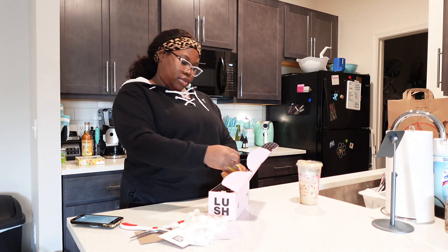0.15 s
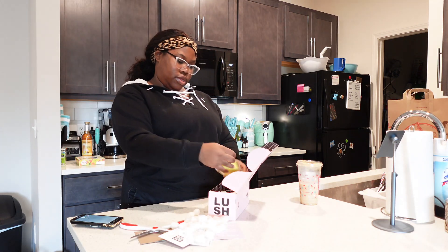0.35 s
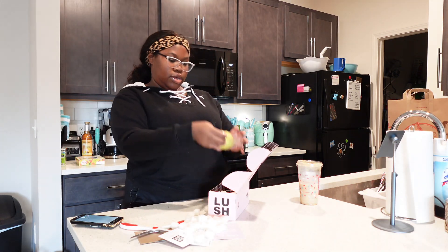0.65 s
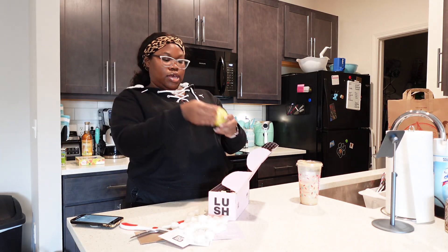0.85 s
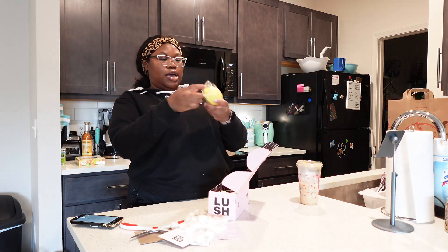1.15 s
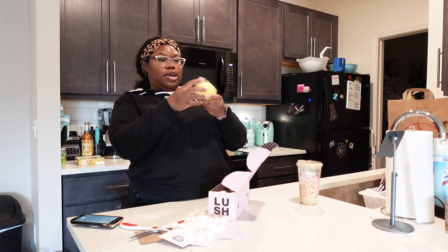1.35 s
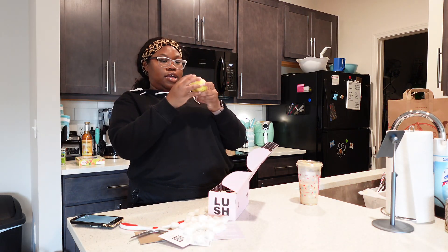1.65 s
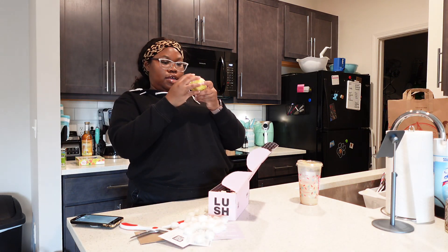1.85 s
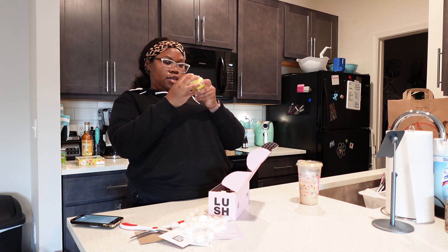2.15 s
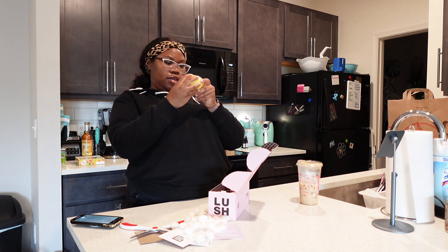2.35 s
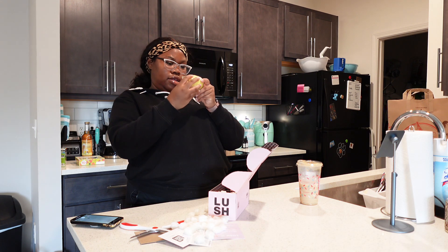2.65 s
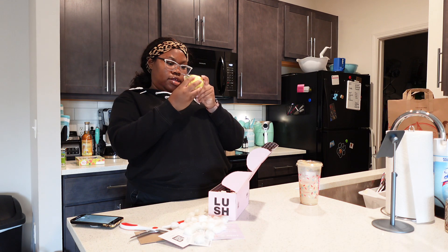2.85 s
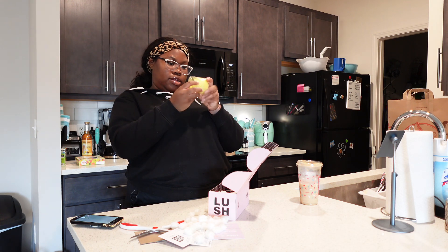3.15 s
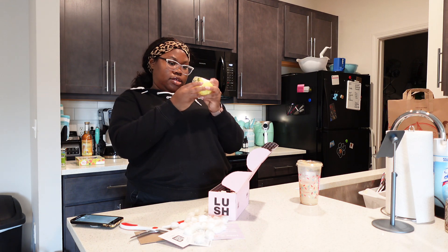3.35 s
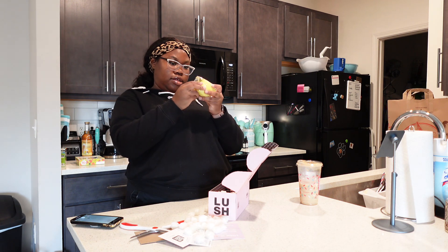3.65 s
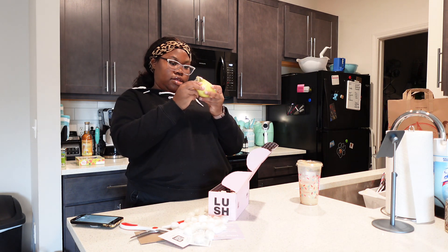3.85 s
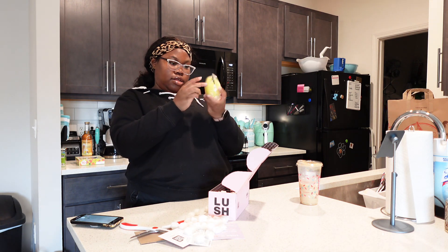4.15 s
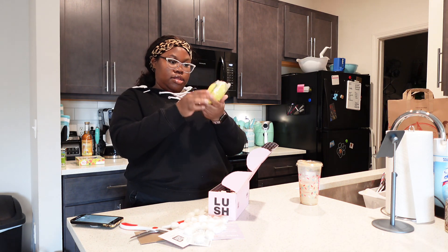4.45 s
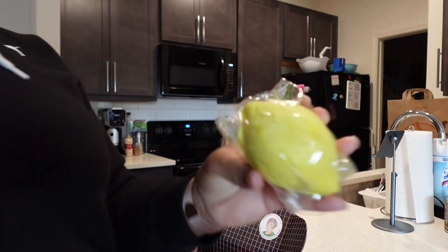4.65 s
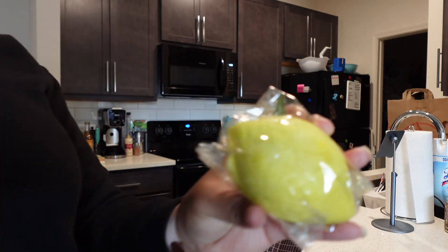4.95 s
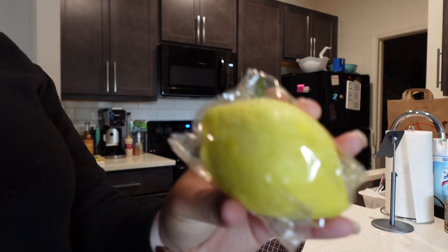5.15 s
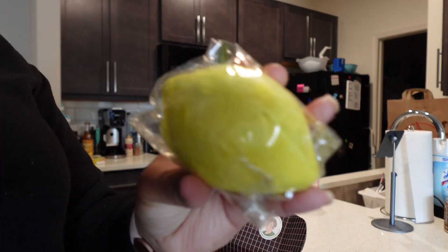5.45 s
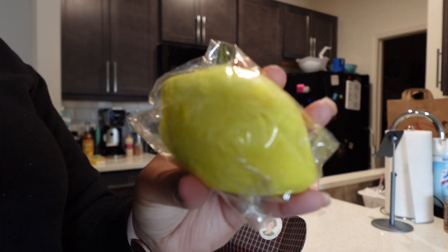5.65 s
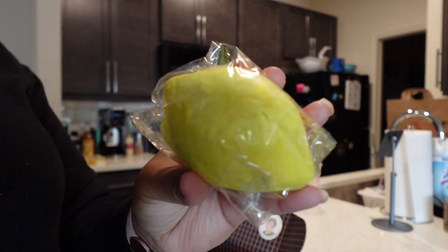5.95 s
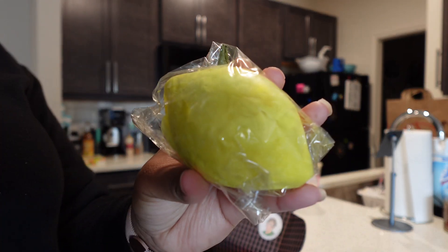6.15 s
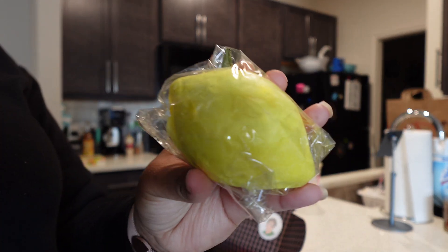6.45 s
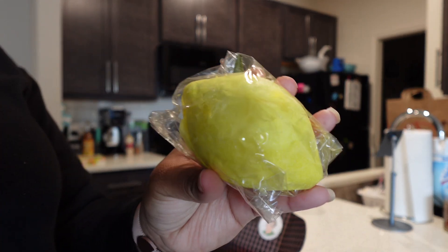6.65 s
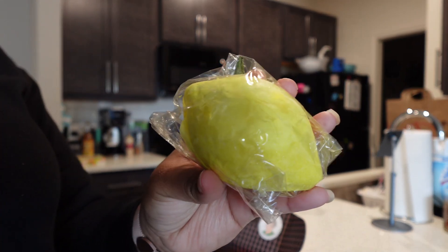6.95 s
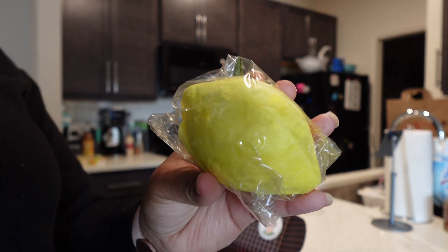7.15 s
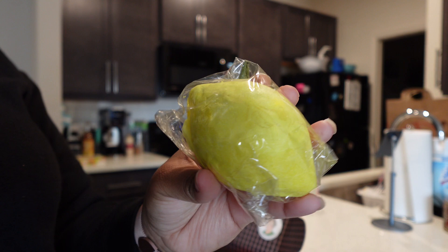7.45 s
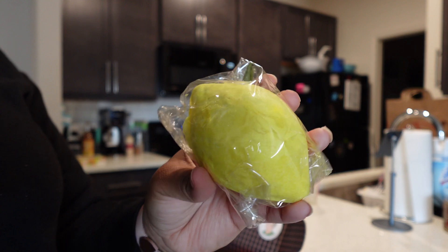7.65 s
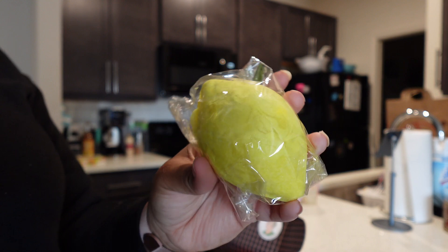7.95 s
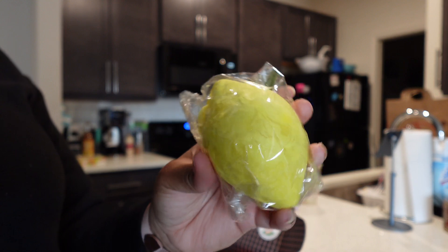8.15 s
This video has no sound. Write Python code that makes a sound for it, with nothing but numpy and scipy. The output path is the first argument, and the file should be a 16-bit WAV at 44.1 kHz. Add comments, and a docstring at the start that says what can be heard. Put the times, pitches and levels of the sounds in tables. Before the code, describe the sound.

Stiff plastic film around a fist-sized bar crackles and snaps in a live kitchen, then close up goes nearly still before fresh loud crinkles.

```python
"""Hands work a bar wrapped in stiff plastic film: panels of film ring briefly as their creases snap.
Many tiny snaps make the crackle, and low noise makes the rub of fingers. Echoes and a fading tail
of sparse taps make the hard kitchen around them; the fading rest of earlier sounds opens the scene.
A refrigerator hums in narrow bands over shaped ventilation noise and hiss.
A cut with a short dip in level joins a distant view to a nearer one with less room sound."""
import sys
import numpy as np
from scipy import signal
from scipy.io import wavfile
from scipy.ndimage import uniform_filter1d

SR = 44100
rng = np.random.default_rng(int(sys.argv[2]) if len(sys.argv) > 2 else 0)


def output_pcm(signal):
    """Save a mono or channel-first signal as 16-bit PCM at the path in sys.argv[1].

    Samples are clipped to [-1, 1] before scaling.
    """
    pcm = np.clip(np.atleast_2d(signal).T, -1, 1) * 32767
    wavfile.write(sys.argv[1], SR, np.round(pcm).astype(np.int16))


def how_loud(loudness_db):
    """Turn decibels into a plain amplitude multiplier (0 dB gives 1, 20 dB gives 10)."""
    steps = np.asarray(loudness_db, float) / 20
    return 10 ** steps


N = 366030  # length [samples]
CUT_S = 4.586  # where the near view takes over from the far one [s]


def evened(x):
    """Scales the whole signal to an rms of 1."""
    return x / np.sqrt(np.mean(x ** 2) + 1e-20)


def unit(x):
    """Scales each row to an energy of 1."""
    return x / np.linalg.norm(x, axis=1, keepdims=True)


def read(points, hz):
    """Reads a curve between its points on a log-frequency axis."""
    f, value = np.transpose(points)
    return np.interp(np.log(hz + 1), np.log(f + 1), value)


def opening_tail(low_db=-54, film_db=-42, t60=0.55):
    """Earlier sounds, a dull one and a crackle, are still dying in the room: fading noise in two bands."""
    noise = rng.standard_normal((2, 2, N))
    low_band = signal.butter(2, [330, 900], "band", fs=SR, output="sos")
    film_band = signal.butter(1, [2000, 8000], "band", fs=SR, output="sos")
    low = signal.sosfilt(low_band, noise[0])
    film = signal.sosfilt(film_band, noise[1])
    both = how_loud(low_db) * evened(low) + how_loud(film_db) * evened(film)
    fading = how_loud(-60 * np.arange(N) / SR / t60)
    return fading * (both + .5 * both[::-1])  # each side also hears half of the other


def hum_and_air(far_db=-1.5):
    """Ventilation noise and microphone hiss from random short-time spectra, and the refrigerator's bands."""
    # colour of the air noise: (frequency [Hz], relative level per Hz [dB])
    air = [(15, -74), (25, -43.5), (70, -26), (184, -6.5), (242, -6), (284, -5.5), (415, -14.5), (772, -16),
           (1070, -20), (1330, -20), (1930, -22.5), (2270, -23), (4720, -27), (13900, -36), (15900, -35)]
    # how alike the air noise is left and right: (frequency [Hz], likeness [0 to 1])
    air_same = [(60, 0.38), (130, 0.27), (290, 0.56), (640, 0.44), (1410, 0.28), (3100, 0.39), (6820, 0.23),
                (15000, 0.88)]
    # refrigerator tones and whines: (frequency [Hz], width setting [Hz], rms before the far cut-back [dB])
    fridge = [(127.5, 2.4, -81), (240.4, 3.6, -61), (759, 2.5, -83.5), (1310, 124, -72.5),
              (11000, 150, -92.5), (14020, 30, -94)]
    frames = N // 1024 + 5
    hz = np.fft.rfftfreq(4096, 1 / SR)
    a, b, c, d = rng.standard_normal((frames, len(hz), 4)).T
    same = np.clip(read(air_same, hz), -1, 1)[:, None]
    left = a + 1j * b
    right = same * left + np.sqrt(1 - same ** 2) * (c + 1j * d)
    spectra = np.array([left, right]) * how_loud(read(air, hz))[:, None]
    far = np.arange(frames) * 1024 / SR < CUT_S
    # the far view has less low noise; the hiss on top stays nearly the same
    spectra *= how_loud(far_db * far / (1 + (hz[:, None] / 1500) ** 2))
    out = how_loud(-60) * evened(signal.istft(spectra, nperseg=4096, noverlap=3072)[1][:, :N])
    t = np.arange(N) / SR
    for f, width, db in fridge:
        wobble = rng.standard_normal((N, 2)) @ [1, 1j]
        for _ in range(2):
            wobble = signal.lfilter([1], [1, -np.exp(-np.pi * width / SR)], wobble)
        steady = 5 * (width < 8)  # motor tones nearly hold their phase, whines are pure noise
        tone = evened(((steady + wobble / wobble.std()) * np.exp(2j * np.pi * f * t)).real)
        out += how_loud(db + far_db * (t < CUT_S)) * tone
    return out


def snap_shapes(hz, burst_db, crack_db, haste=1):
    """A panel of film rings a few cycles under a wide burst; the crease itself cracks in the treble."""
    size = 300  # samples
    ring_cycles, rise_s, burst_s, crack_s = 1.86, 0.00019, 0.0016, 0.00013  # at haste 1
    t = np.arange(size) / SR
    age = t * haste  # more haste, quicker rise and decay
    noise = rng.standard_normal((len(hz), 2 * size + 1))
    hz = hz[:, None]
    wave = np.sin(2 * np.pi * hz * t + 3 * noise[:, :1])
    ring = wave * (1 - np.exp(-age / rise_s)) * np.exp(-age * hz / ring_cycles)
    burst_band = signal.butter(2, [1300, 6500], "band", fs=SR, output="sos")
    burst = signal.sosfilt(burst_band, noise[:, 1:size + 1] * np.exp(-age / burst_s))
    crack_band = signal.butter(2, [7000, 12500], "band", fs=SR, output="sos")
    crack = signal.sosfilt(crack_band, noise[:, size + 1:] * np.exp(-age / crack_s))
    burst_gain, crack_gain = how_loud(np.minimum([burst_db, crack_db], 0))[:, :, None]
    # the ring takes the energy left, but never less than a floor
    ring_gain = np.sqrt(np.clip(1 - burst_gain ** 2 - crack_gain ** 2, .15, 1))
    whole = ring_gain * unit(ring) + burst_gain * unit(burst) + crack_gain * unit(crack)
    # a small panel radiates no bass
    whole = signal.sosfilt(signal.butter(3, 1200, "high", fs=SR, output="sos"), whole)
    return whole / abs(whole).max(1, keepdims=True)


def snaps(room_haste=2.0):
    """Creases pop over: one line goes straight to the microphones, a quicker-dying one feeds the room."""
    # single creases that stand out, from faint ticks to loud pops:
    # (time [s], peak level before panning [dB], ring [Hz], treble crack's share [dB])
    creases = [(.008,-33,7000,-1),(.016,-24.5,6640,-1.5),(0.2134,-30,8000,-5),(.336,-30.5,3440,-4),(0.3773,-35,3340,-3.5),(0.5072,-41,2340,-13),(0.652,-35,3930,-8),(.701,-46,3800,-15),(0.7146,-26.5,4440,-19),(0.731,-24.5,7060,-15),(0.769,-16.5,4560,-19),(.8084,-25,3680,-7),(.842,-20.5,5400,-9),(0.8607,-18.5,4830,-8.5),(.891,-24,5000,-18.5),(0.9036,-19.5,6370,-8.5),(0.9249,-18.5,3750,-3.5),(.948,-15,6170,-9),(1.017,-16,5180,-11.5),(1.1221,-24.5,5200,-7.5),(1.1518,-16,4850,-16.5),(1.193,-17,5450,-10.5),(1.2433,-19,4420,-15),(1.262,-20,4300,-20.5),(1.2752,-5,7800,-1),(1.4593,-20.5,5740,-8),(1.4694,-17,4200,-4.5),(1.5834,-21.5,5700,-10.5),(1.6269,-19,3600,-16),(1.7324,-18,5400,-17),(1.9055,-28,3650,-22),(1.9639,-26,3840,-15),(1.9658,-15.5,3700,-5),(2.0656,-20,5730,-11),(2.1606,-34,2640,-19),(2.2508,-24,7500,-3.5),(2.2764,-31,4000,-6),(2.436,-35,3850,-3),(2.6053,-40.5,4550,-5.5),(2.7045,-37,4240,-4),(2.753,-26,4240,-2.5),(2.8062,-22.5,4860,-8),(2.8457,-22,5440,-13),(2.8988,-23,4500,-8),(2.951,-21.5,5510,-9),(2.988,-16,4830,-10.5),(3.0188,-20,4640,-16),(3.0393,-19.5,6900,-6.5),(3.0309,-21,5350,-10),(3.052,-14,5560,-8),(3.1108,-23.5,3960,-12),(3.135,-14.5,5560,-6.5),(3.141,-17,8400,-3),(3.18,-7.5,6250,-2.5),(3.2164,-13,6500,-3.5),(3.2723,-21,2000,-6),(3.2913,-18.5,3200,-4.5),(3.3178,-21,3060,-1),(3.372,-23,3500,-6.5),(3.4012,-16.5,2970,-10),(3.4124,-12,6300,-9.5),(3.5134,-13,4400,-6),(3.57,-16.5,8600,-3.5),(3.5871,-23,4520,-17),(3.612,-20,3500,-2),(3.625,-14.5,2640,-3),(3.7255,-19,6430,-7),(3.785,-16,4800,-6),(3.8182,-22,7150,-6),(3.8603,-23.5,4260,-1),(3.8904,-14.5,3850,-3.5),(3.9304,-21,4200,-5),(3.9666,-18.5,5540,-5),(4.0227,-20,7200,-10),(4.0304,-14,5860,-7),(4.0522,-15,4170,-8),(4.0711,-17.5,6050,-5.5),(4.181,-23.5,4430,-13),(4.215,-23.5,6240,-10),(4.2234,-24,3100,-7.5),(4.255,-21,3250,-4.5),(4.2975,-24,5400,-3),(4.319,-16.5,3830,-8),(4.3412,-27,8960,-18),(4.4007,-15,3670,-11.5),(4.4033,-16,3430,-7.5),(4.4278,-15.5,3500,-8),(4.5512,-28.5,3600,-27),(4.6007,-6.5,5900,-16),(4.6012,-12,1800,-15),(4.6158,-14,1820,-8),(4.6683,-22.5,2920,-13),(4.7104,-25.5,2930,-28),(4.7248,-22.5,6850,-23),(4.7421,-30,2220,-22),(4.7877,-31.5,1450,-28),(4.7962,-30,5160,-24.5),(4.8857,-38,5800,-8),(4.8966,-38,5500,-15),(5.0092,-43.5,4730,-15),(5.059,-45,4970,-15),(5.2924,-16.5,3590,-5.5),(5.9825,-44.5,1330,-32),(6.044,-32,3850,-24),(6.2886,-41.5,2580,-29),(6.714,-25,3540,-3),(6.8607,-22.5,5340,-7.5),(7.4202,-45,6070,-16),(7.6566,-30.5,5600,-4.5),(7.6763,-34,6800,-10),(7.6817,-17.5,3740,-16.5),(7.708,-11.5,2470,-9),(7.7138,-22.5,2110,-27),(7.721,-19.5,1580,-7.5),(7.732,-17,3760,-8),(7.818,-28.5,3220,-23),(7.8729,-11.5,4500,-2.5),(7.9825,-14.5,7660,-6),(8.0233,-14.5,2450,-14),(8.106,-36,2710,-30),(8.1328,-15.5,6200,-11),(8.1417,-10.5,6600,-8),(8.1544,-16.5,2720,-10),(8.161,-20,3970,-10),(8.1865,-15.5,3420,-5.5),(8.2183,-7,2230,-3),(8.2667,-19.5,5040,-13)]
    burst_share = .25  # of the energy that the crack leaves, before the change with strength
    s, db, hz, crack_db = np.transpose(creases)
    wait, strength, pitch = rng.random((len(s), 3)).T
    # in the hard wringing of the far view a pop sets off the next crease along
    chained = s < CUT_S
    next_s = s + .003 + .0032 * wait
    next_db = db - 9 + 6.5 * (2 * strength - 1)
    next_hz = hz * (.85 + .4 * pitch)
    s = np.r_[s, next_s[chained]]
    db = np.r_[db, next_db[chained]]
    hz = np.r_[hz, next_hz[chained]]
    crack_db = np.minimum(np.r_[crack_db, crack_db[chained]], -.5)
    burst_db = 10 * np.log10(burst_share * (1 - how_loud(2 * crack_db)))
    burst_db += -.01 * (db + 21)  # stronger pops ring a little more and burst less
    direct = snap_shapes(hz, burst_db, crack_db) * how_loud(db)[:, None]
    # the room gets the same energy from each pop
    energy_root = np.linalg.norm(direct, axis=1, keepdims=True)
    spread = unit(snap_shapes(hz, burst_db, crack_db, room_haste)) * energy_root
    out = np.zeros((2, N + 400))
    for line, shapes in zip(out, (direct, spread)):
        np.add.at(line, np.round(s * SR).astype(int)[:, None] + np.arange(shapes.shape[1]), shapes)
    return out[:, :N]


def kitchen(x, echoes, tail_db, build_s, same=0.86):
    """Counter and wall echoes, then a tail of sparse taps, each band dying at its own speed."""
    # the room's tail: (frequency [Hz], time to fall 60 dB [s], relative level [dB])
    tail_bands = [(500, 1, 2), (1520, 0.58, -2.5), (4000, 0.5, 2), (9070, 0.43, -1), (15230, 0.36, -2)]
    # the side the tail leans to: (frequency [Hz], left minus right [dB])
    lean = [(600, 3.5), (1200, 5.5), (4000, 1), (9000, 0.6)]
    taps = np.zeros((2, SR // 2))
    # one tap at a random place in every 20 samples
    at = np.arange(200, SR // 2 - 20, 20) + rng.integers(0, 20, (2, (SR // 2 - 201) // 20))
    np.put_along_axis(taps, at, rng.choice([-1., 1.], at.shape), 1)
    hz, t, z = signal.stft(taps, SR, nperseg=256)
    z[1] = same * z[0] + np.sqrt(1 - same ** 2) * z[1]  # the two sides are partly alike
    z *= how_loud(read(lean, hz)[:, None] * np.reshape([.5, -.5], (2, 1, 1)))
    t60, colour_db = (read(np.take(tail_bands, [0, k], axis=1), hz)[:, None] for k in (1, 2))
    shape = how_loud(colour_db - 60 * t / t60) * (1 - np.exp(-t / build_s))
    tail = signal.istft(z * shape, SR, nperseg=256)[1]
    tail = how_loud(tail_db) * tail / np.linalg.norm(tail[0])
    for s, db in echoes:
        # cluttered surfaces smear each echo, the later ones more
        smear = rng.standard_normal(size=200) * np.exp(-np.arange(200) / (0.034 * s * SR + 3))
        first = round(s * SR * rng.uniform(1.0, 1.03))
        tail[:, first:first + len(smear)] += how_loud(db) * smear / np.linalg.norm(smear)
    return signal.fftconvolve(x[None], tail, axes=1)[:, :N]


def varied_room(x, *room, turns_per_s=7.3, count=4):
    """Several random draws of the same room take turns, so no single tail colours the whole scene."""
    draw = (np.arange(N) / SR * turns_per_s).astype(int) % count
    return sum(kitchen(x * (draw == k), *room) for k in range(count))


def handling():
    """Gain of the fine work on the film, practically silent while it is held still."""
    # how hard the film is worked, one list per spell: (time [s], level [dB])
    spells = [
        [(.55, -64.5), (.7, -50.5), (.81, -31.5), (.95, -46.5), (1.2, -39.5), (1.45, -53.5), (1.7, -44),
         (1.85, -66), (1.98, -35.5), (2.2, -56.5), (2.4, -61)],
        [(2.66, -65.5), (2.81, -44), (3.18, -36.5), (3.45, -39), (3.75, -46), (4.05, -39.5), (4.35, -52.5),
         (4.63, -47), (4.8, -58), (5.02, -70)],
        [(7.6, -64), (7.8, -53), (7.94, -47), (8.1, -71), (8.3, -54)],
    ]
    t = np.arange(N) / SR
    return sum(how_loud(np.interp(t, *np.transpose(rows), -150, -150)) for rows in spells)


def crackle(per_s=450, spread_db=6.0, count=24):
    """Many small creases pop at random, more loudly as the film is worked harder."""
    # colour of the crackle: (frequency [Hz], relative level per Hz [dB])
    film_colour = [(240, -58), (400, -9), (1140, -40.5), (1900, 2), (2660, -2.5), (3350, 0), (3850, -4.5),
                   (8850, -3.5), (13400, -16), (15900, -18)]
    shapes = snap_shapes(np.geomspace(1500, 8000, count), *np.full((2, count), -11.5))
    pops = rng.random(N) < per_s / SR
    size = how_loud(spread_db * np.minimum(rng.exponential(1, N), 3)) * pops
    which = rng.integers(0, count, N)
    grains = evened(sum(signal.oaconvolve(size * (which == k), shapes[k])[:N] for k in range(count)))
    # replace the grains' own colour by the film's
    hz, power = signal.welch(grains, SR, nperseg=128)
    colour = how_loud(read(film_colour, hz)) / np.sqrt(power + 1e-9)
    grains = signal.oaconvolve(grains, signal.firwin2(129, hz, colour, fs=SR), "same")
    return how_loud(-6) * handling() * evened(grains)


def rubbing(db=-25):
    """Fingers sliding on the film: a soft, lumpy low rustle of noise that follows the handling."""
    noise = rng.standard_normal((3, N))
    lumps = how_loud(4.2 * evened(uniform_filter1d(noise[2], 900)))
    band = signal.butter(2, [330, 900], "band", fs=SR, output="sos")
    rustle = signal.sosfilt(band, noise[:2] + .6 * noise[1::-1])  # the two sides partly mixed
    return how_loud(db) * handling() * evened(lumps * rustle)


def scene():
    """Adds the sounds; the near view has less room on the film, more hum and the hand further right."""
    # early echoes in the far view: (time [s], level [dB])
    far_echoes = [(.001, -1.5), (.0055, -14.5), (.008, -15.5), (0.025, -16)]
    # early echoes in the near view: (time [s], level [dB])
    near_echoes = [(.0078, -21), (.015, -24), (.030, -21), (.033, -22)]
    near = np.arange(N) / SR > CUT_S
    film, spread = snaps() + crackle()
    far_room = varied_room(spread * ~near, far_echoes, -1.6, 0.0021) * ~near
    near_room = varied_room(spread * near, near_echoes, -12.5, 0.017)
    # a small, fast random left-right balance widens the film sound
    sway_db, sway_s = .45, .01
    sway = evened(uniform_filter1d(rng.standard_normal(N), round(sway_s * SR)))
    pan_db = (np.where(near, -.2, .1) + sway_db * sway) * np.reshape([1, -1], (2, 1))
    return film * how_loud(pan_db) + far_room + near_room + rubbing() + opening_tail() + hum_and_air()


def low_pass(x):
    """Removes everything above the highest recorded frequency."""
    return signal.sosfilt(signal.butter(12, 16990, fs=SR, output="sos"), x)


def record(dry):
    """The level dips fast at the cut and returns more slowly; then the microphones' colour and band limit."""
    # the two microphones differ: (frequency [Hz], left minus right [dB])
    mic_sides = [(125, -.5), (250, -0.8), (500, 1.5), (1000, 1), (2000, -0.9), (4000, -2.3), (8000, -2.5),
                 (12000, 0.1)]
    t = np.arange(N) / SR - CUT_S
    fade = np.clip(np.where(t < 0, -t / 0.002, t / 0.012), .4, 1)
    hz = np.linspace(0, SR / 2, num=513)
    below_limit = hz < 16400
    filters = [signal.firwin2(511, hz, how_loud(side * read(mic_sides, hz)) * below_limit, fs=SR)
               for side in (.5, -.5)]
    limited = signal.oaconvolve(dry * fade, filters, "same", axes=1)
    return low_pass(limited)


dry = scene()
out = record(dry)
output_pcm(out)
```